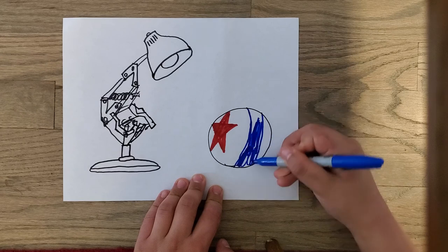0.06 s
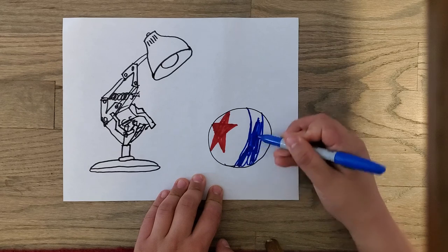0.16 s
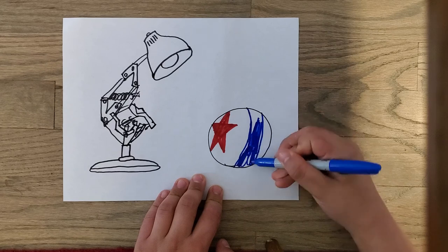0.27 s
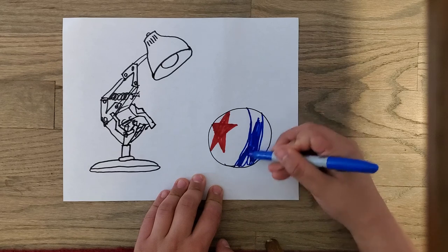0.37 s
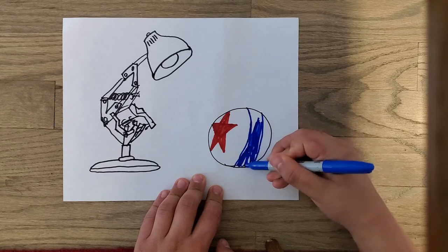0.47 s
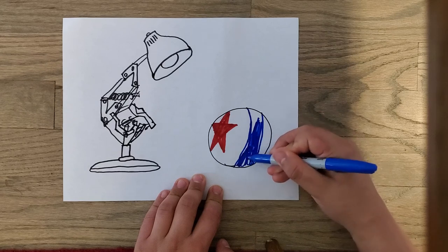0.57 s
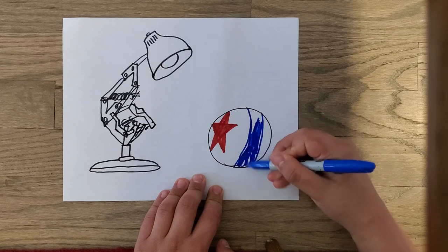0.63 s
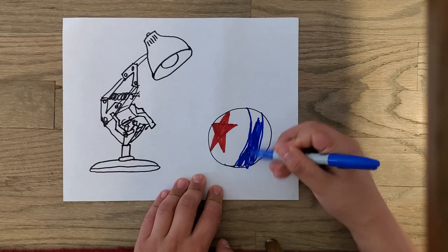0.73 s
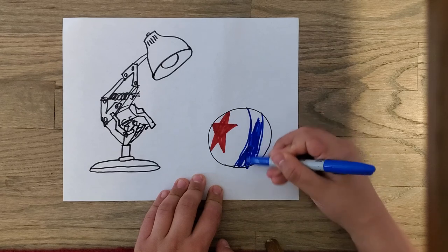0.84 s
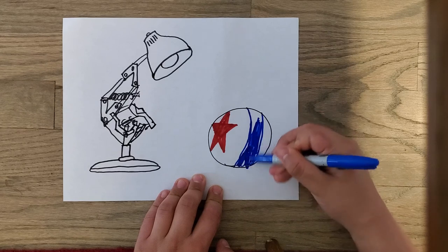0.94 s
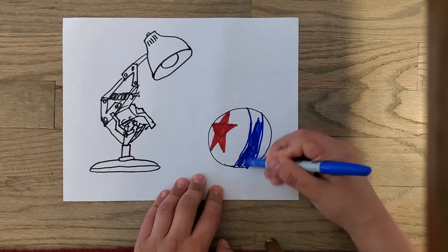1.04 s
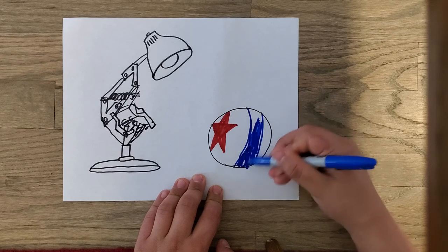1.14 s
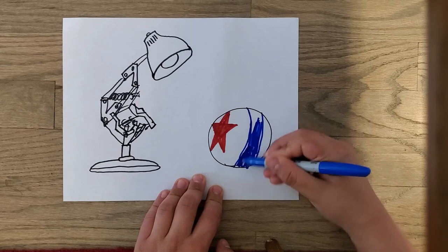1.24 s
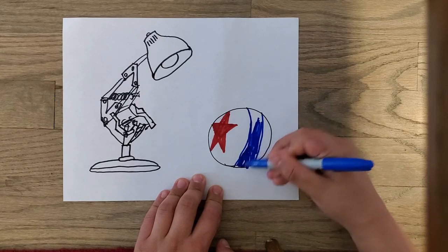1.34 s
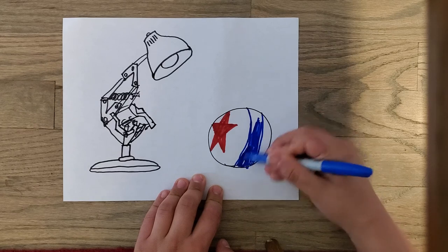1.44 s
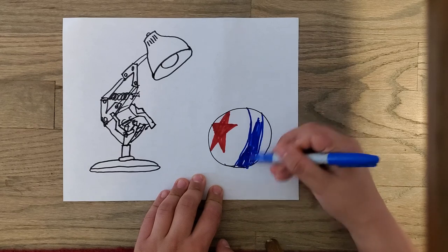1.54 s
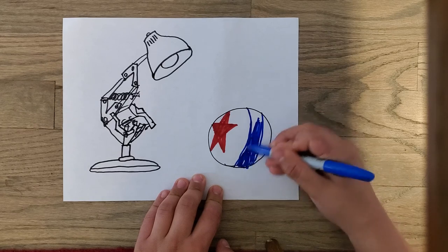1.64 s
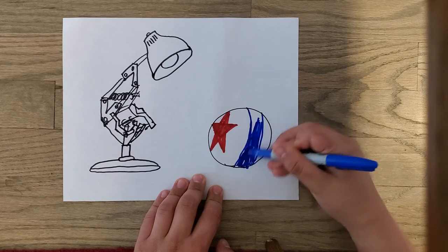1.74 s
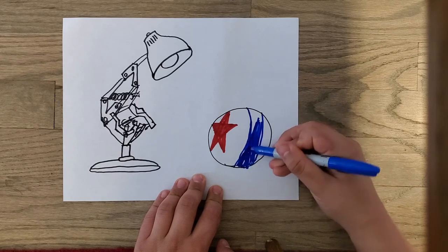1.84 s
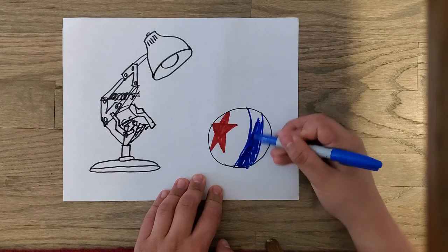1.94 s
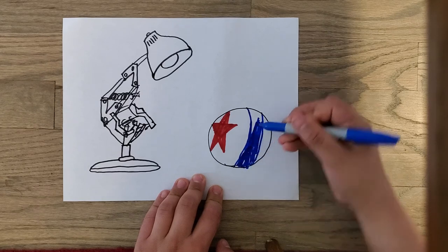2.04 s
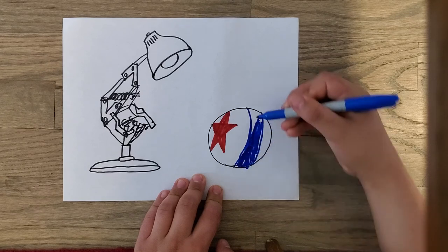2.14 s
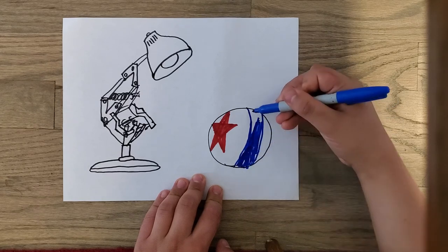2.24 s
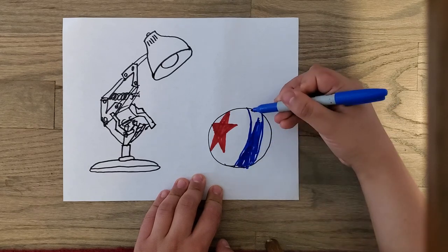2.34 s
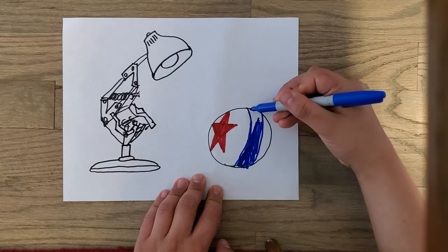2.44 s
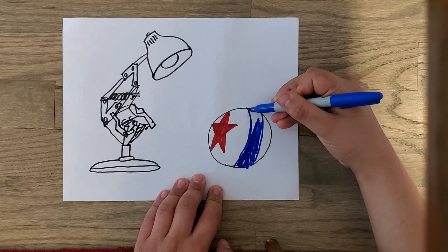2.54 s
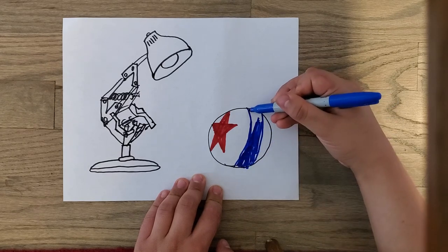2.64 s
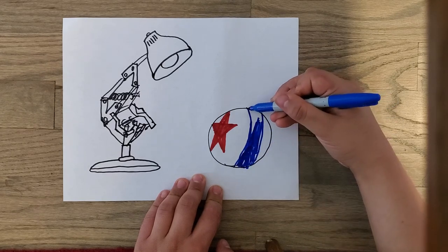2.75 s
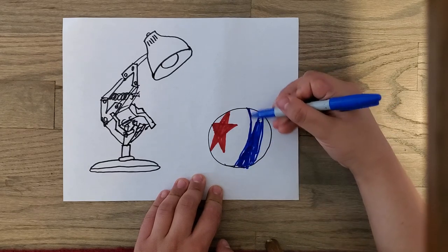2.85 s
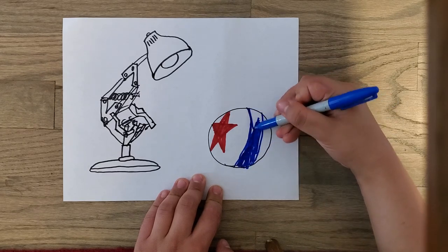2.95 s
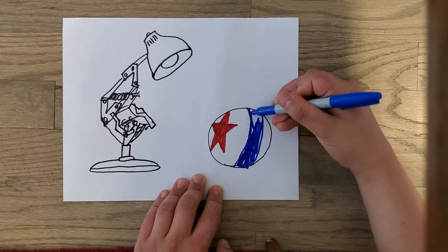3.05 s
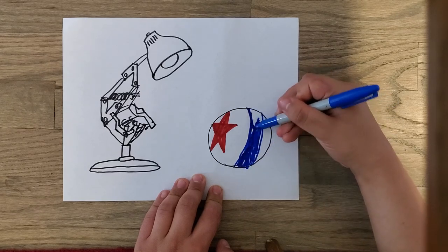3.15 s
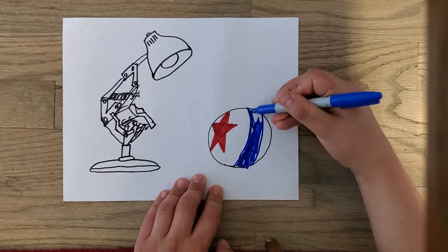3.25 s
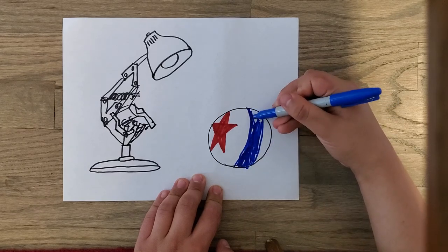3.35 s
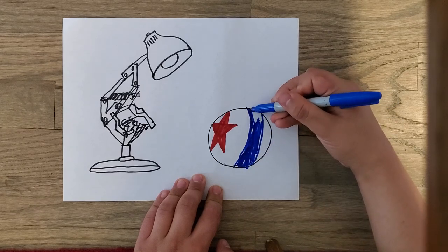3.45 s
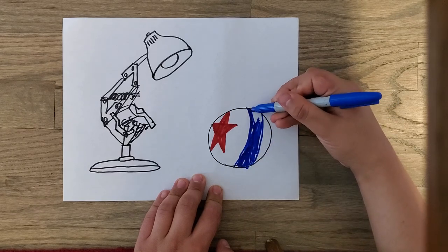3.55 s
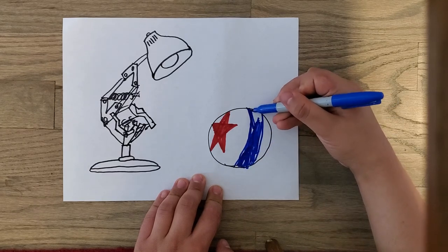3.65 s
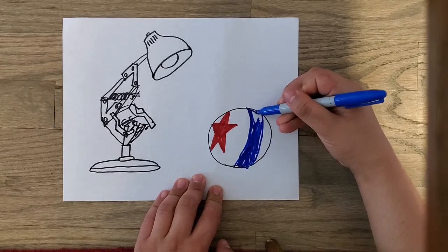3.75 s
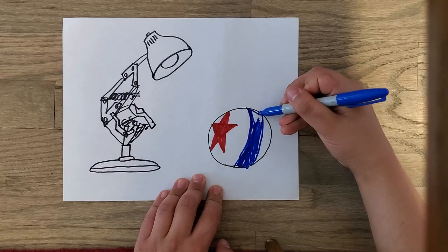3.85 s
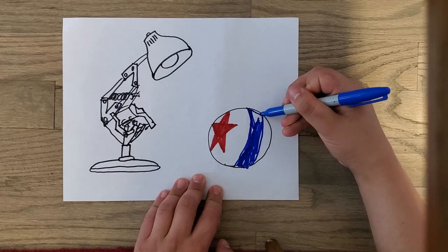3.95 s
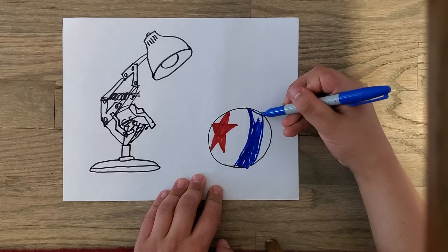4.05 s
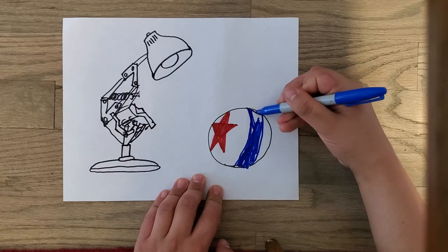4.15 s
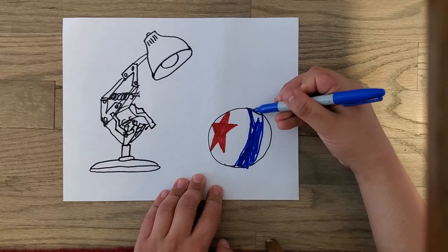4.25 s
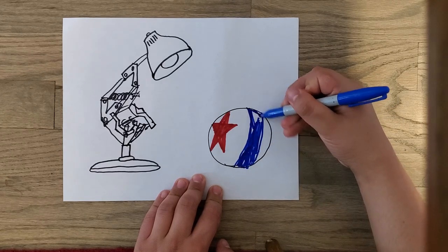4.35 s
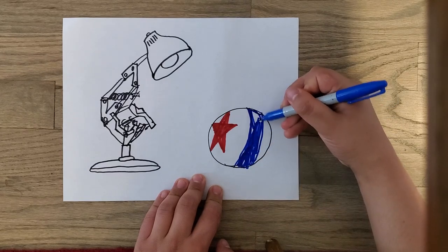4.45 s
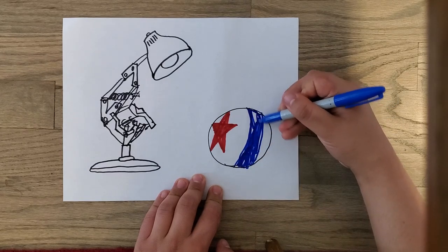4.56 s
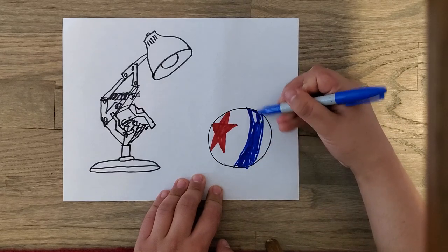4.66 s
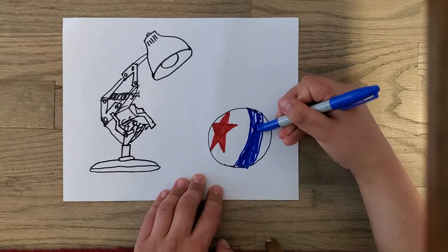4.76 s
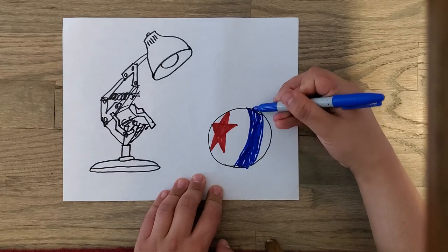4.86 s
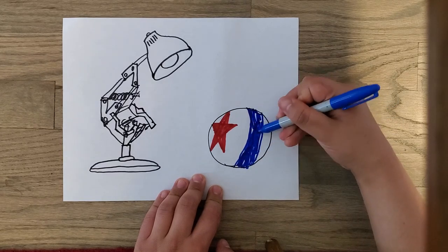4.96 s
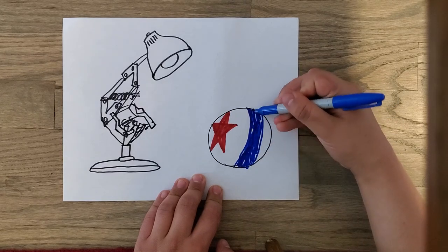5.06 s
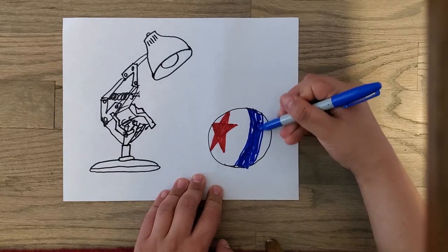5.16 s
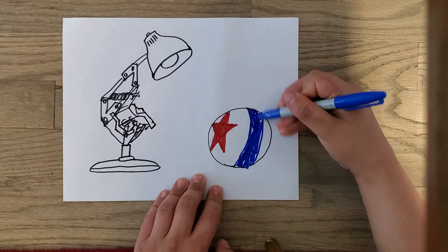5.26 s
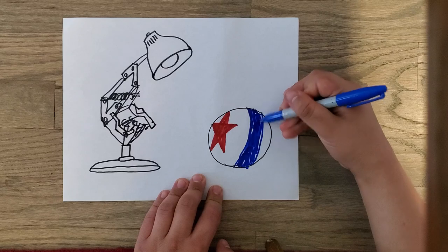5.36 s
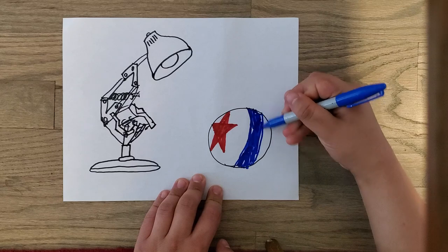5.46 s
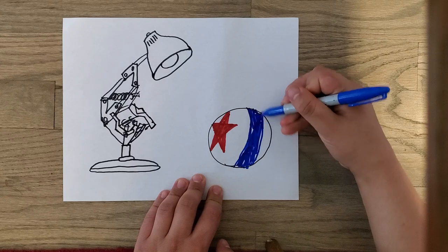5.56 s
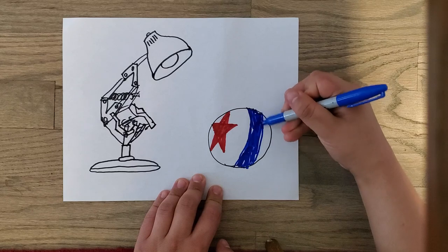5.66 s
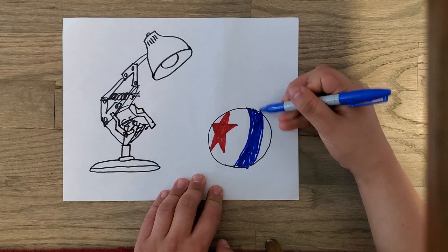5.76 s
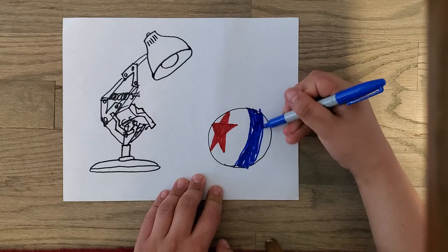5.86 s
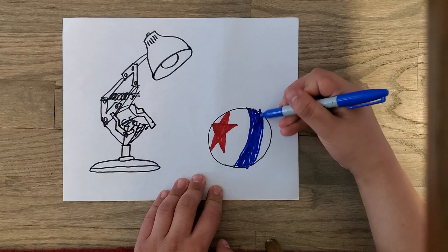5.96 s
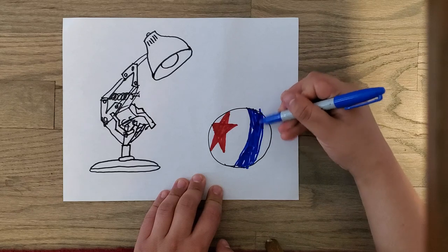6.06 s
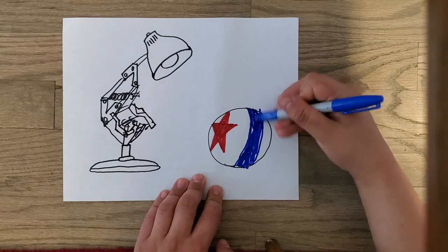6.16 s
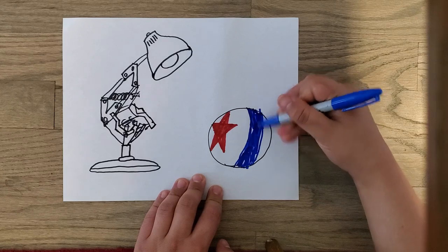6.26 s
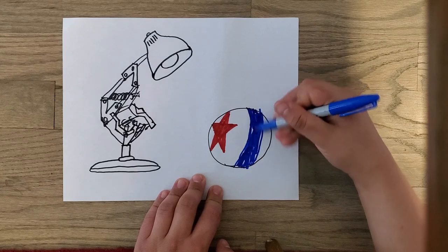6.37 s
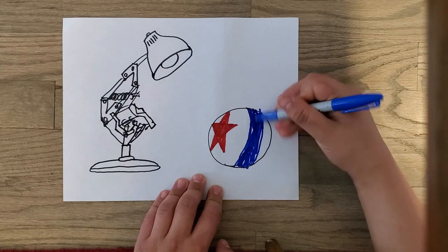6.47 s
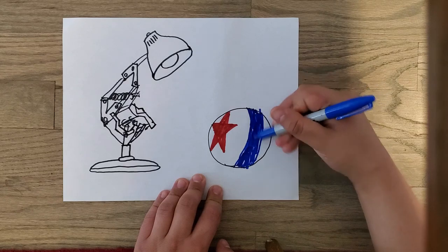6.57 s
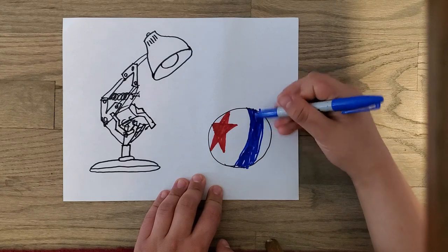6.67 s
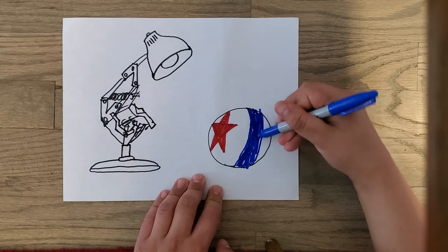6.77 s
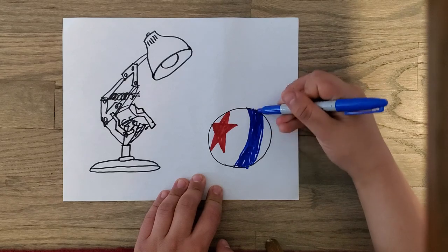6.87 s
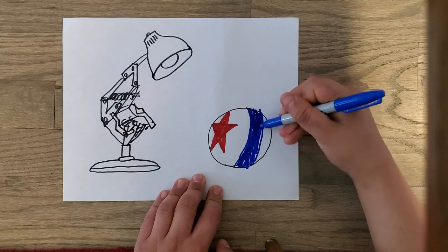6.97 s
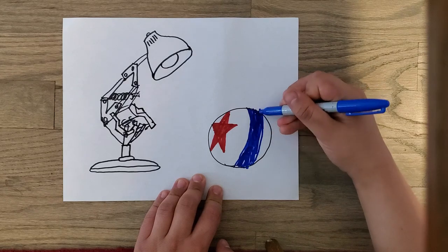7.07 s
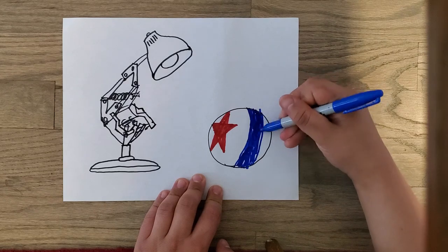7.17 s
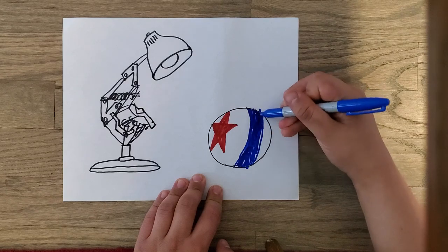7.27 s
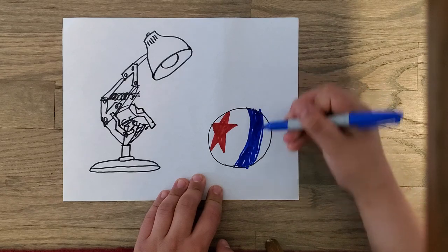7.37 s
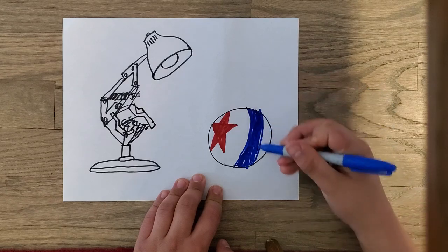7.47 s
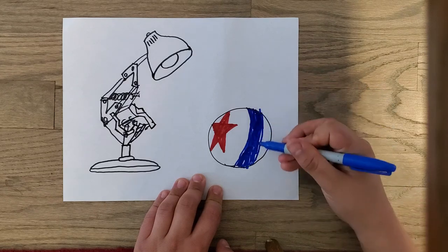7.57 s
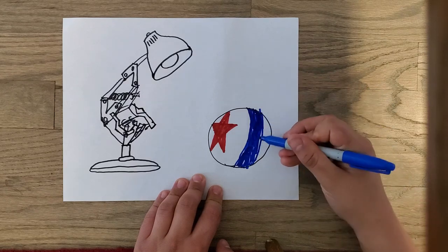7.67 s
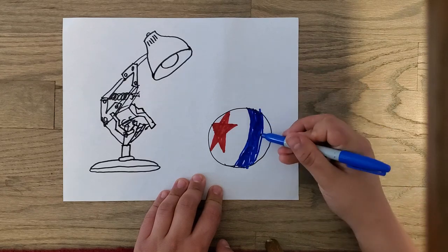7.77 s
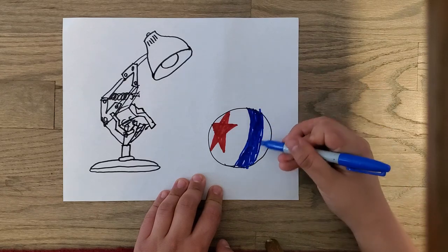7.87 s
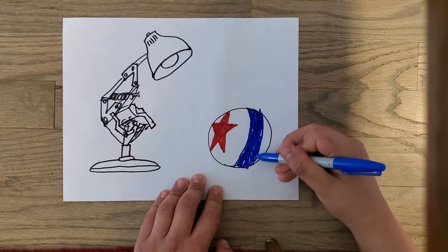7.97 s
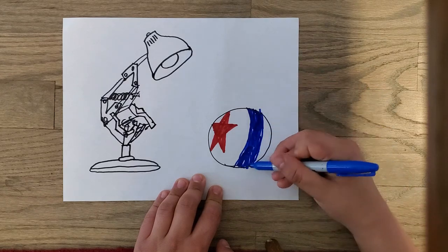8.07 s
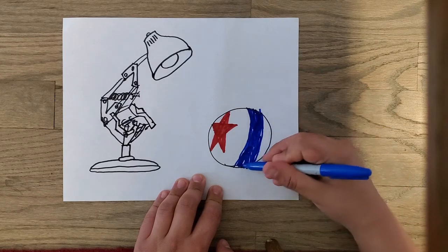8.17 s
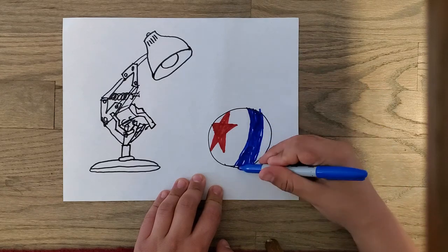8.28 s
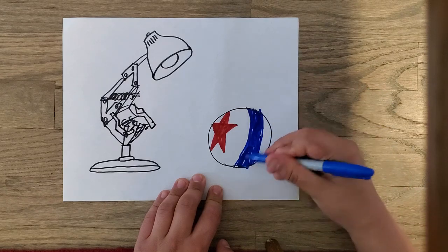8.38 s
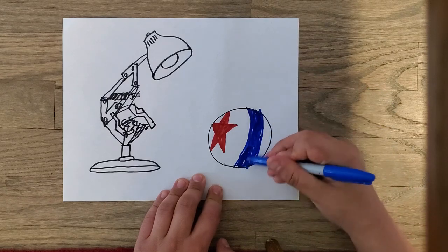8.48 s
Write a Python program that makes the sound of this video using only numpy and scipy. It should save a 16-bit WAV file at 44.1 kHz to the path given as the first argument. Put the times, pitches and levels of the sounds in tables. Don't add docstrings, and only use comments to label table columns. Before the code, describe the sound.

Rapid, dry back-and-forth marker scribbling on paper at a wooden table, broken by short gaps, above a low mains hum and ventilation rumble.

```python
import sys
import numpy as np
from scipy import signal
from scipy.fft import rfft, irfft, next_fast_len
from scipy.io import wavfile
from scipy.ndimage import uniform_filter1d, map_coordinates

SR = 44100
rng = np.random.default_rng(int(sys.argv[2]) if len(sys.argv) > 2 else 0)


def undo_db(level):
    steps = np.asarray(level, float) / 20
    return 10 ** steps


def unload_wav(signal):
    wavfile.write(
        sys.argv[1],
        SR,
        np.round(np.clip(np.atleast_2d(signal).T, -1, 1) * 32767).astype(np.int16),
    )


N = 375291

# centre in Hz, width in Hz, level in dB.
WOOD = [(560, 210, -5.5), (803, 150, 2), (994, 264, -0.5), (1720, 505, 0.14)]
# time in seconds, weight on the tip in dB, weight on the wrist in dB, room share in dB.
HAND = [(0, 0, 7, -10.5), (.45, -1.5, -2, -9), (.7, -2.5, -2, -9), (1.35, -6.5, -3, -9.5),
        (1.7, -5.5, 2, -10), (2.04, 3, -2, -10), (2.6, -5.5, -10.5, -11), (3.1, -1.5, 3, -9.5),
        (3.45, 0, -8.5, -10.5), (3.9, -13, -5.5, 2), (4.2, -7, -8.5, -11), (4.55, -1.5, -6.5, -10.5),
        (5.0, -8, -1, -10.5), (6.1, -2, -1.5, -10), (6.9, -1, 3.5, -11.5), (7.5, -4, -4, -9.5),
        (8.0, -2, -3.5, -11.5), (8.5, 5.5, 0, -6)]


def unit(x):
    return x / np.sqrt(np.mean(x ** 2) + 1e-20)


def along(points, hz):
    f, v = np.transpose(points)
    return np.interp(np.log(hz + 1), np.log(f + 1), v)


def curves(rows):
    s, *cols = np.transpose(rows)
    return [np.interp(np.arange(N) / SR, s, c) for c in cols]


def faded(rows):
    before = (rows[0][0] - 0.02, -120, *rows[0][2:])
    after = (rows[-1][0] + 0.018, -120, *rows[-1][2:])
    return curves([before, *rows, after])


def wobble(rate):
    return map_coordinates(rng.standard_normal(int(N * rate / SR) + 4), [np.arange(N) * rate / SR])


def filtered(x, response):
    m = next_fast_len(N + SR // 2)
    return irfft(rfft(x, m) * response(np.fft.rfftfreq(m, 1 / SR)), m)[..., :N]


def modes(rows):
    def response(f):
        return sum((-1) ** k * undo_db(db) * 1j * f * w / (c * c - f * f + 1j * f * w)
                   for k, (c, w, db) in enumerate(rows))
    return response


def motion():
    # time of top speed in
    # seconds, rise in seconds, fall in seconds, friction in dB, ringing of the barrel in a loose grip in dB.
    scribbles = [(.03, 0.03, 0.054, -35.5, 1.7), (.14, 0.034, 0.042, -33.5, 0.8),
                 (.244, 0.034, 0.046, -32, 2), (.345, 0.011, 0.033, -34, .3),
                 (.407, 0.02, 0.052, -40, 0.5), (.546, 0.027, 0.043, -48.5, -2),
                 (0.64, 0.018, 0.05, -45, -0.5), (.728, .018, 0.062, -39.5, -0.5),
                 (.839, 0.036, 0.052, -39.5, 1.5), (.943, 0.015, 0.059, -41.5, -1.7),
                 (1.056, 0.043, 0.034, -41, 0.8), (1.155, 0.036, 0.044, -47, -2),
                 (1.256, 0.038, 0.047, -43.5, 0.5), (1.374, 0.037, .036, -45, -1),
                 (1.469, 0.039, 0.032, -41, 1.8), (1.569, 0.056, 0.048, -40.5, 0),
                 (1.657, 0.027, 0.049, -38, 1), (1.759, 0.032, 0.054, -40.5, 1),
                 (1.86, 0.025, 0.041, -40, .3), (1.962, 0.025, 0.051, -36.5, 1),
                 (2.875, 0.0068, 0.088, -42.5, 2.1), (3.012, 0.016, 0.069, -38.5, 1),
                  (3.114, 0.0075, 0.057, -39, 0.8), (3.223, 0.018, 0.059, -36, 1),
                  (3.319, 0.014, 0.042, -46.5, -2), (3.415, 0.0052, 0.059, -44, -1.5),
                  (4.48, 0.0035, 0.047, -39, 3), (4.553, 0.013, 0.043, -40, .3),
                  (4.641, 0.011, 0.023, -43, .3), (4.678, 0.028, 0.023, -35.5, 0.8),
                  (4.748, 0.034, 0.03, -34.5, 2.5), (4.852, 0.043, 0.023, -33, 2.6),
                  (4.912, 0.026, 0.03, -38, 1), (4.945, 0.032, 0.029, -36.5, 1.5),
                  (5.038, 0.035, 0.023, -35.5, 0.8), (5.113, 0.027, 0.053, -38.5, -0.3),
                  (5.224, 0.031, 0.018, -34.5, 2), (5.273, 0.01, 0.053, -39.5, 0),
                  (5.373, 0.017, 0.028, -43.5, .3), (5.445, 0.014, 0.049, -41, 1.3),
                 (5.567, 0.053, 0.025, -38, 2), (5.621, 0.014, 0.06, -42, 2),
                  (5.771, 0.045, 0.017, -38, 0), (5.814, 0.01, 0.056, -36, 1.2),
                  (5.95, 0.036, .019, -37.5, 0), (6.04, 0.054, 0.032, -43.5, 1.8),
                  (6.127, 0.022, 0.032, -40, -1), (6.215, 0.044, 0.047, -37, 1),
                  (6.317, 0.033, 0.028, -36, -0.5), (6.386, 0.024, 0.052, -36, 0.8),
                  (6.492, 0.024, 0.034, -34.5, -0.5), (6.565, 0.015, 0.059, -34.5, 1),
                  (6.692, 0.04, 0.028, -34.5, -1.5), (6.762, 0.018, 0.051, -36, -0.5),
                  (6.87, 0.031, 0.03, -33, 0), (6.923, 0.0051, 0.059, -37, 0),
                  (7.054, 0.041, 0.027, -39.5, 0), (7.174, 0.057, 0.039, -40.5, -0.7),
                  (7.269, 0.033, 0.037, -38.5, 1.4)]
    # time of top speed in seconds, rise in seconds,
    # fall in seconds, friction in dB, barrel minus hiss in dB.
    touches = [(2.07, 0.05, 0.09, -60, -3.5), (2.2, 0.09, 0.085, -62, -8),
               (2.851, 0.0045, 0.033, -46.5, -5), (4.116, 0.0051, 0.043, -69, 13),
               (4.197, 0.034, 0.024, -49.5, 3.5), (4.342, 0.015, 0.03, -51.5, 2),
               (4.39, 0.035, 0.029, -42.5, 0), (7.373, 0.016, 0.031, -58, -5),
               (7.48, 0.053, 0.067, -62.5, -4.5), (7.824, 0.006, 0.045, -60.5, 7),
               (7.882, 0.0069, 0.033, -45, -9), (7.941, 0.045, 0.04, -39, -5),
               (7.97, 0.012, 0.016, -43.5, 10), (8.058, 0.062, 0.033, -41.5, 6),
               (8.138, 0.015, 0.068, -52, 23.5), (8.228, 0.029, 0.02, -47, 19.5),
               (8.3, .05, 0.033, -79, 7.5), (8.36, 0.016, 0.032, -51.5, 1.5),
               (8.41, 0.045, 0.034, -47.5, 1.5), (8.474, 0.009, 0.043, -42, -2.5)]
    medium_db, medium_barrel_db = -40, -5
    t = np.arange(N) / SR
    hiss, barrel, tilted, sheet, table, moving = np.zeros((6, N))
    strokes = []
    for s, rise, fall, db, loose_db in scribbles:
        barrel_db = loose_db + medium_barrel_db - 0.64 * (db - medium_db)
        flat = 2.02 * (fall / rise) ** 0.32
        strokes.append((s, rise, fall, db, barrel_db, flat, barrel))
    strokes += [(*row, 1.53, tilted) for row in touches]
    for s, rise, fall, db, barrel_db, flat, rings in strokes:
        near = slice(max(round((s - 0.3) * SR), 0), round((s + 0.4) * SR))
        rising = t[near] < s
        away = np.where(rising, (s - t[near]) / rise, (t[near] - s) / fall)
        power = undo_db(-20 * away ** (flat * np.where(rising, 1.3, 1)))
        to_barrel = undo_db(2 * db) / (1 + undo_db(-2 * barrel_db))
        hiss[near] += power * undo_db(2 * db) / (1 + undo_db(2 * barrel_db))
        rings[near] += power ** 0.95 * to_barrel
        sheet[near] += power ** 0.65 * to_barrel
        table_db = 0.84 * (db - medium_db) + 0.62 * (min(barrel_db, 4) - medium_barrel_db)
        table[near] += power ** 0.55 * undo_db(2 * table_db)
        moving[near] += power
    return hiss, barrel, tilted, sheet, table, moving


def fibres(grain_db, patchy_db):
    clumps = undo_db(grain_db * wobble(700) + grain_db * 2.0 * wobble(90))
    z = signal.stft(rng.standard_normal(N) * clumps, nperseg=256)[2]
    field = uniform_filter1d(rng.standard_normal(z.shape), size=3, axis=0)
    field = uniform_filter1d(field, size=26, axis=1)
    return signal.istft(z * undo_db(patchy_db * unit(field)), nperseg=256)[1][:N]


def flexing():
    # centre in Hz, width in Hz, level in dB.
    sheet_modes = [(1984, 406, -2), (2784, 380, 2.5), (3148, 555, 3), (4110, 890, 1.5)]

    def shifted(k):
        rub = fibres(grain_db=-0.37, patchy_db=1.5)
        return unit(filtered(rub, lambda hz: modes(sheet_modes)(hz * k) ** 2))

    low, high = shifted(1.025), shifted(1 - 0.025 / 2)
    bend = np.pi / 4 * (1 + np.tanh(wobble(7)))
    return np.sin(bend) * low + np.cos(bend) * high


def scuffs(rows):
    t = np.arange(N) / SR
    return sum(undo_db(2 * db) * np.exp(-((t - s) / length) ** 2 * 2) for s, length, db in rows)


def marker(hiss, barrel, tilted, sheet, table):
    # frequency in Hz, density in dB per Hz.
    hiss_spectrum = [(6000, -55), (7500, -10), (8500, -4), (9700, -1.5), (10600, 2), (12300, 2.5),
                     (13800, 2.5), (15500, -1), (17000, -21)]
    # centre in Hz, width in Hz, level in dB.
    barrel_modes = [(4630, 3300, -6.5), (5905, 870, 6), (6470, 1870, 3.5), (8400, 4540, -2.5)]
    tilted_modes = [(5360, 1400, 3.5), (6550, 1000, 5), (8100, 1650, -1)]
    scuffed_modes = [(603, 216, -2.5), (793, 120, 2.5), (1003, 250, -1.5), (1290, 280, 0), (1860, 920, -3)]
    # time in seconds, length in seconds, level in dB.
    sheet_scuffs = [(.28, 0.029, -74), (0.446, 0.033, -60), (.65, .05, -68), (0.996, 0.021, -62),
                    (1.64, 0.081, -60.5), (2.034, 0.025, -58), (2.27, .01, -69.5), (3.25, 0.028, -62),
                    (3.46, 0.049, -66), (4.195, 0.055, -59.5), (4.27, .05, -74), (4.405, 0.017, -58.5),
                    (4.518, 0.04, -57), (4.7, 0.027, -68), (5.574, .05, -70), (5.798, 0.035, -64.5),
                    (7.03, 0.03, -71), (7.071, .008, -59), (7.18, 0.027, -69), (7.385, 0.017, -65.5),
                    (7.45, 0.1, -73.5), (8.0, 0.052, -56), (8.07, 0.033, -58), (8.26, 0.036, -58),
                    (8.44, .03, -63.5), (8.49, 0.023, -61)]
    weight_db = curves(HAND)[0]
    bright = unit(filtered(fibres(grain_db=0.74, patchy_db=1.8),
                           lambda hz: undo_db(along(hiss_spectrum, hz) - 60 * (hz < 5000))))
    tube = unit(filtered(fibres(grain_db=1.07, patchy_db=0.8),
                         lambda hz: modes(barrel_modes)(hz) / (1 + (3800 / (hz + 1)) ** 6)))
    slant = unit(filtered(fibres(grain_db=1.16, patchy_db=1.5),
                          lambda hz: modes(tilted_modes)(hz) / (1 + (4500 / (hz + 1)) ** 8)))
    paper = flexing()
    rubbed = unit(filtered(fibres(grain_db=1.2, patchy_db=1.0), lambda hz: modes(scuffed_modes)(hz) ** 2))
    wood = unit(filtered(fibres(grain_db=1.5, patchy_db=1.5), lambda hz: modes(WOOD)(hz) ** 2))
    pen = np.sqrt(hiss) * bright + np.sqrt(barrel) * tube + np.sqrt(tilted) * undo_db(-0.5) * slant
    pen += np.sqrt(sheet) * undo_db(-8.5 + 0.14 * weight_db) * paper
    pen += np.sqrt(undo_db(2 * (-62 + weight_db)) * (undo_db(-48.5) + table)) * wood
    return pen + np.sqrt(scuffs(sheet_scuffs)) * rubbed


def ticks():
    # start in seconds, peak in dB, lower mode in Hz, upper mode in Hz.
    clicks = [
        (6.2587, -45, 2120, 3000),
        (7.3694, -62, 2150, 3000),
        (7.7453, -56.5, 2130, 2900),
    ]
    out, t = np.zeros(N + SR), np.arange(SR // 10) / SR
    for s, db, low_hz, high_hz in clicks:
        ring = 1.1 * undo_db(-60 * t / 0.012) * np.sin(2 * np.pi * low_hz * t)
        ring += 1.3 * undo_db(-60 * t / 0.008) * np.sin(2 * np.pi * high_hz * t)
        jitter = 3 * rng.standard_normal(len(t)).cumsum() / 12
        snap = 1.2 * undo_db(-60 * t / 0.008) * np.sin(2 * np.pi * 3700 * t + jitter)
        out[round(s * SR):][:len(t)] += undo_db(db + 10.5) * (1 - np.exp(-t / 0.0012)) * (ring + snap)
    return out[:N]


def drag():
    # time in seconds, level in dB.
    slide_level = [
        (3.6, -92),
        (3.702, -70.5),
        (3.742, -76),
        (3.78, -70.5),
        (3.818, -80),
        (3.894, -82.5),
        (4.098, -98),
        (4.112, -74.5),
        (4.19, -61),
    ]
    # centre in Hz, width in Hz, level in dB.
    light_modes = [(5380, 620, 7), (6240, 380, -13.5), (8250, 610, -9.5), (13300, 2000, -11.5)]
    slide = unit(filtered(fibres(grain_db=0.0, patchy_db=1),
                          lambda hz: modes(light_modes)(hz) / (1 + (4300 / (hz + 1)) ** 8)))
    wood = unit(filtered(rng.standard_normal(N), lambda hz: modes(WOOD)(hz) ** 2))
    return undo_db(faded(slide_level)[0] + 6.0) * (slide + undo_db(-5.0) * wood)


def room(x):
    # frequency in Hz, time to fall by 60 dB in seconds.
    decay_times = [(500, 0.27), (2000, 0.35), (6000, 0.42), (15000, 0.21)]
    # frequency in Hz, gain in dB.
    right_colour = [(500, 16), (1500, 5), (4000, 6), (6000, 1), (8500, 4), (11500, -1), (15500, 1.5)]
    hz, t, z = signal.stft(rng.standard_normal((4, 2, SR // 2)), SR, nperseg=128)
    decay = undo_db(-60 * t / along(decay_times, hz)[:, None]) + 1.0 * undo_db(-60 * t / 0.0048)
    tails = signal.istft(z * decay, SR, nperseg=128)[1]
    turn = np.arange(N) / SR * np.pi / 0.2 - np.arange(4)[:, None] * np.pi / 2
    shares = np.maximum(np.cos(turn), 0) ** 2 * np.pad(x, (120, 0))[:N]
    m = next_fast_len(N + SR // 2)
    colour = undo_db(np.outer([0, 1], along(right_colour, np.fft.rfftfreq(m, 1 / SR))))
    paths = rfft(tails / np.linalg.norm(tails[0, 0]), m)
    return irfft(colour * np.sum(rfft(shares, m)[:, None] * paths, axis=0), m)[:, :N]


def ports(x, notches):
    def port(dips, hz):
        return np.prod([1 - np.clip(d, -1, 1) / (1 + (2 * (hz - c) / w) ** 2) for c, w, d in dips], axis=0)
    return filtered(x, lambda hz: np.array([port(dips, hz) for dips in notches]))


def placed(x):
    # time in seconds, shares (0-1) far from the body, at the edge, at the foot.
    places = [
        (0, .1, 0, 0),
        (2.0, .15, 0, 0),
        (2.3, 1, 0, 0),
        (7.3, 1, 0, 0),
        (7.8, 0, 1, 0),
        (8.29, 0, 1, 0),
        (8.33, 0, 0, 1),
        (8.51, 0, 0, 1),
    ]
    # centre in Hz, width in Hz, depth as a share (a peak if below 0).
    far_notches = [
        [(3150, 250, -.5), (3600, 350, .7), (5400, 300, -.3), (7400, 450, .8), (8250, 200, .35),
         (10500, 300, -.3), (11200, 220, .5), (11720, 250, -.5), (11970, 180, .55), (15100, 1200, -.25)],
        [(1300, 500, -.4), (1900, 200, .4), (3500, 400, .3), (5900, 2000, -.3), (7600, 700, .5),
         (13050, 200, -.4)],
    ]
    near_notches = [
        [(1050, 300, .4), (6700, 200, -.4), (7200, 700, .25), (11050, 180, .4), (12500, 500, -.15),
         (15000, 600, .25)],
        [(800, 300, .3), (7000, 500, .2), (7800, 500, .4), (8600, 400, -.3), (11200, 1200, -.3)],
    ]
    edge_notches = [
        [(1200, 300, -.4), (4400, 500, .4), (6650, 400, -.5), (7850, 300, -.3), (9300, 400, -.4),
         (10800, 500, -.5), (12200, 1600, .35)],
        [(3300, 700, .35), (6300, 600, -.2), (7900, 400, .35), (9300, 500, -.4), (11200, 900, -.6),
         (14500, 2000, -.4)],
    ]
    foot_notches = [
        [(1800, 600, .4), (3200, 600, -.3), (5000, 600, -.3), (6700, 1200, .55), (8700, 700, -.5),
         (9700, 500, -.8), (12000, 2000, .4)],
        [(3400, 500, -.3), (6000, 2000, .25), (11400, 400, -.6), (12800, 400, .4), (14500, 1500, -.4)],
    ]
    # frequency in Hz, gain in dB.
    close_colour = [(1000, -0.5), (1500, -5.5), (2200, 5.5), (3200, -1.5), (4600, -1), (5900, 1.5),
                    (7500, 0), (12000, -1)]
    far, edge, foot = curves(places)
    close = filtered(x, lambda hz: undo_db(along(close_colour, hz)))
    out = far * ports(x, far_notches) + (1 - far - edge - foot) * ports(close, near_notches)
    return out + edge * ports(close, edge_notches) + foot * ports(close, foot_notches)


def wrist(table):
    # centre in Hz, width in Hz, level in dB.
    board_modes = [(353.7, 73, 3), (491.5, 26.5, 2.5), (570, 110, -8.5)]
    # time in seconds, length in seconds, level in dB.
    heel_shifts = [(.09, 0.051, -74), (1.39, .025, -64), (2.07, .03, -68), (2.74, 0.019, -73),
                   (3.04, .05, -66), (3.72, .03, -64), (4.54, 0.036, -59), (4.76, 0.044, -58.5),
                   (4.94, .04, -68), (5.22, .03, -84), (5.57, 0.1, -61.5), (5.84, .04, -72),
                   (6.24, .03, -62.5), (6.6, 0.05, -64), (6.8, 0.017, -61), (7.0, .08, -79),
                   (7.3, 0.017, -75), (7.48, 0.19, -61.5)]
    level_db = -67.5
    rub = filtered(undo_db(2 * wobble(15)) * rng.standard_normal((3, N)),
                   lambda hz: modes(board_modes)(hz) / (1 + (hz / 750) ** 4))
    rocking = np.sqrt(0.38 + 0.54 * table + scuffs(heel_shifts) / undo_db(2 * level_db))
    weight = undo_db(level_db + curves(HAND)[1] + np.array([[-0.8], [0.8]]))
    return weight * rocking * unit(rub[0] + 0.76 * rub[1:])


def thuds():
    # start in seconds, peak in dB, frequency in Hz, time to fall by 60 dB in seconds.
    blows = [
        (2.715, -33.5, 80, 0.16),
        (3.449, -49, 48.6, 0.18),
        (7.473, -40.5, 53, 0.28),
    ]
    out, t = np.zeros(N + SR), np.arange(SR // 2) / SR
    for s, db, hz, t60 in blows:
        ring = undo_db(db - 60 * t / t60) * np.sin(2 * np.pi * hz * t)
        out[round(s * SR):][:len(t)] += (1 - np.exp(-t / 0.056)) * ring
    return out[:N]


def creaks():
    # time in seconds, pitch in Hz, level in dB.
    low_creak = [
        (8.28, 1075, -80),
        (8.302, 1100, -65),
        (8.314, 1110, -80),
        (8.336, 1130, -56.5),
        (8.372, 1130, -65),
        (8.41, 1128, -58),
        (8.428, 1150, -67),
        (8.47, 1130, -65),
        (8.51, 1110, -67),
    ]
    high_creak = [
        (7.44, 2090, -92),
        (7.456, 2090, -77),
        (7.496, 2140, -79),
        (7.55, 2130, -89),
        (7.65, 2100, -87),
        (7.695, 2090, -93),
        (7.712, 2080, -83),
        (7.74, 2100, -87),
    ]
    # time in seconds, share of noise (0-1).
    fraying = [(7.44, .2), (7.5, .4), (7.75, .35), (8.28, .2), (8.34, .08), (8.365, .4), (8.41, .1),
               (8.435, .8), (8.51, .9)]
    out, (frays,) = np.zeros(N), curves(fraying)
    for rows in low_creak, high_creak:
        db, hz = faded([(s, db, hz) for s, hz, db in rows])
        turn = 2 * np.pi * np.cumsum(hz + 8 * wobble(30)) / SR
        slips = wobble(190) * np.sin(turn) + wobble(190) * np.cos(turn)
        out += undo_db(db + 3.5) * (np.sqrt(1 - frays) * np.sin(turn) + np.sqrt(frays) * slips)
    return out


def hush(spectrum):
    # frequency in Hz, correlation (-1 to 1).
    likeness = [(60, 0.86), (180, 0.7), (550, 0.13), (1650, -0.34), (4970, -0.01), (15000, -0.28)]

    def mid_side(hz):
        turn = np.arccos(np.clip(along(likeness, hz), -1, 1)) / 2
        return undo_db(along(spectrum, hz)) * np.array([np.cos(turn), np.sin(turn)])

    mid, side = filtered(rng.standard_normal((2, N)), mid_side)
    return unit(np.array([mid + side, mid - side]))


def background(moving):
    # frequency in Hz, level in dB.
    hum_tones = [(120, 0), (240, -17), (261, -18.5), (288, -17)]
    # frequency in Hz, density in dB per Hz.
    rumble_spectrum = [(14, -45.5), (25, -31.5), (40, -12), (65, -9.5), (100, -11), (150, -16.5),
                       (200, -14.5), (225, -20), (300, -23.5), (480, -34.5), (800, -42.5), (1300, -42.5),
                       (2600, -110)]
    air_spectrum = [(530, -32), (900, -19), (1770, -18), (2190, -7), (3150, -11.5), (3430, -15),
                    (5820, -18), (7060, -24), (13500, -18.5), (16000, -14)]
    # time in seconds, level of the hum in dB.
    gain_control = [(0.0, -55.5), (0.16, -53), (0.47, -54), (0.52, -61), (0.68, -55.5), (1.21, -55),
                    (2.58, -60.5), (3.15, -55), (3.51, -60), (4.69, -57.5), (6.54, -56.5), (6.94, -54.5),
                    (7.61, -58), (7.99, -53.5), (8.18, -57), (8.51, -55)]
    opening = uniform_filter1d(moving, size=round(0.026 * SR)) - 0.5
    hum_db = curves(gain_control)[0] + 2.5 * opening
    t = np.arange(N) / SR
    hum = sum(undo_db(db + 4.0 + 0.58 * wobble(12)) * np.sin(2 * np.pi * hz * t + 0.32 * wobble(4.9))
              for hz, db in hum_tones)
    rumble = undo_db(0.81 * (hum_db + 56) - 60.5) * hush(rumble_spectrum) * undo_db([[-0.4], [0.4]])
    air = undo_db(-82.5 + 4.5) * hush(air_spectrum) * undo_db([[1.5], [-1.5]])
    return undo_db(hum_db) * hum + rumble + air


def scene():
    # centre in Hz, width in Hz, depth as a share (a peak if below 0).
    port_notches = [
        [(1200, 300, .45), (2000, 150, .6), (4050, 220, .8), (8900, 300, .4), (14250, 600, .45),
         (15550, 400, -.4)],
        [(650, 300, .3), (4050, 200, .4), (8000, 400, .5), (13600, 500, .3), (15400, 700, -.5)],
    ]
    *friction, table, moving = motion()
    pen = marker(*friction, table) + ticks()
    squeaks = creaks()
    wet = room(undo_db(curves(HAND)[2]) * pen + 0.2 * squeaks)
    direct = pen * np.array([[1], [0]]) + drag() * undo_db([[0], [-17]])
    near = ports(placed(direct + wet), port_notches)
    return near + squeaks * undo_db([[-1.5], [1.5]]) + wrist(table) + thuds() + background(moving)


def roll_off(x):
    return signal.sosfilt(signal.butter(12, 17070, fs=SR, output="sos"), x)


def record(dry):
    return roll_off(filtered(dry, lambda hz: hz < 15790))


dry = scene()
out = record(dry)
unload_wav(out)
```